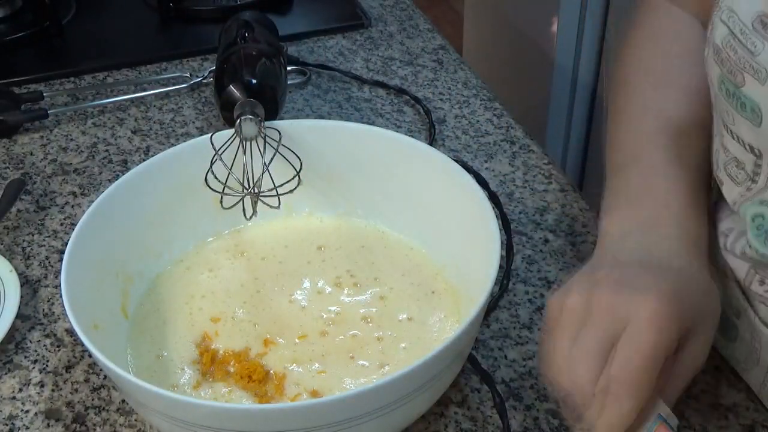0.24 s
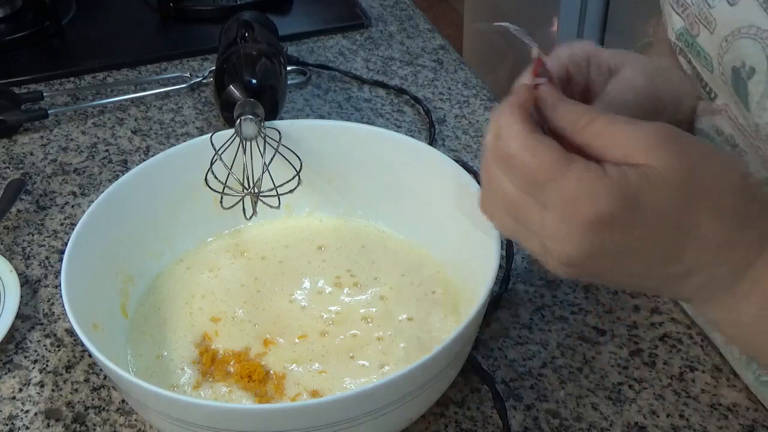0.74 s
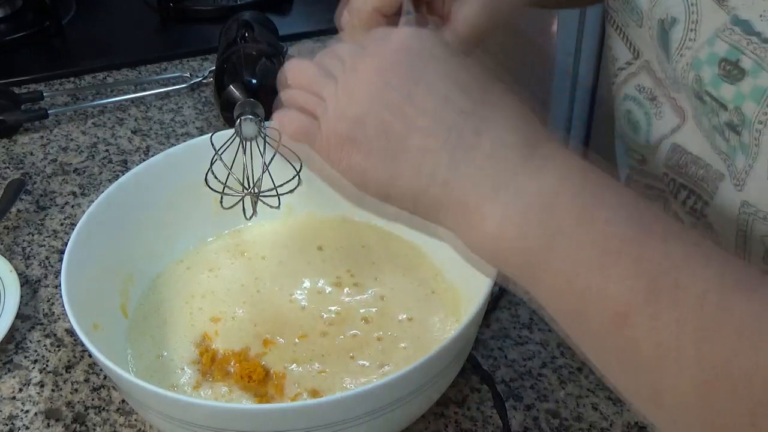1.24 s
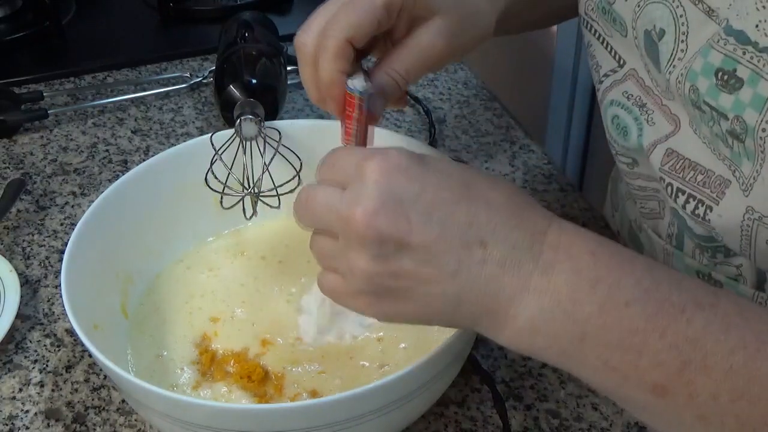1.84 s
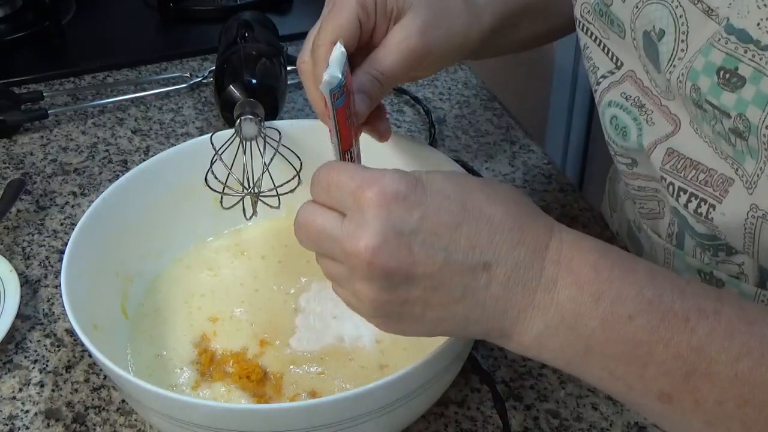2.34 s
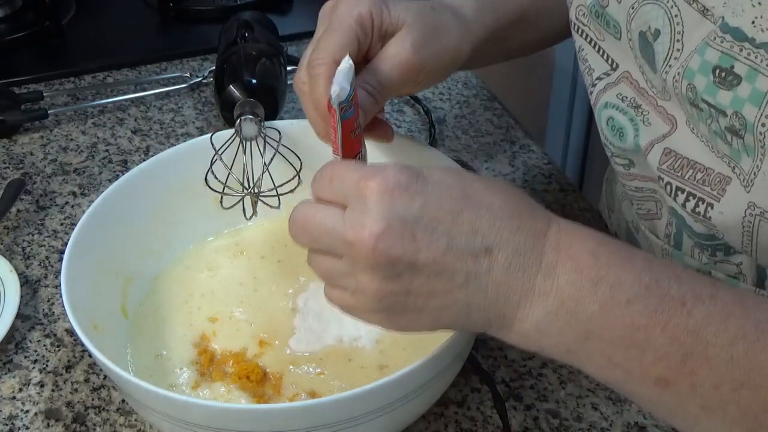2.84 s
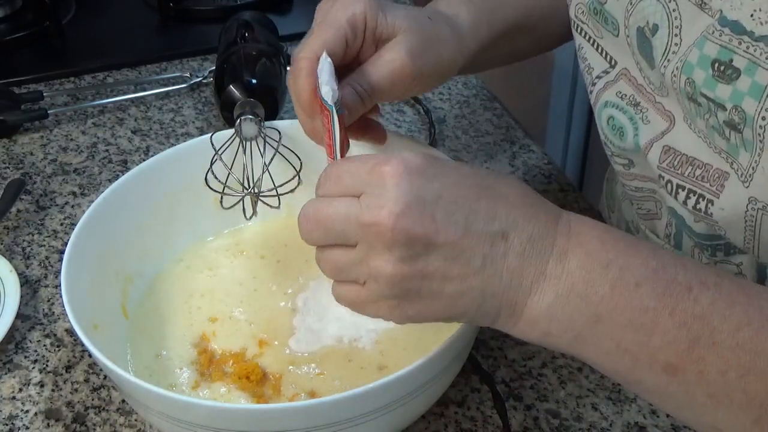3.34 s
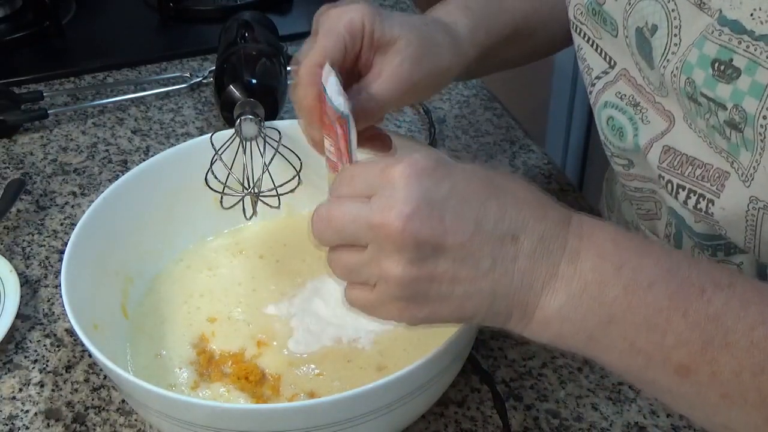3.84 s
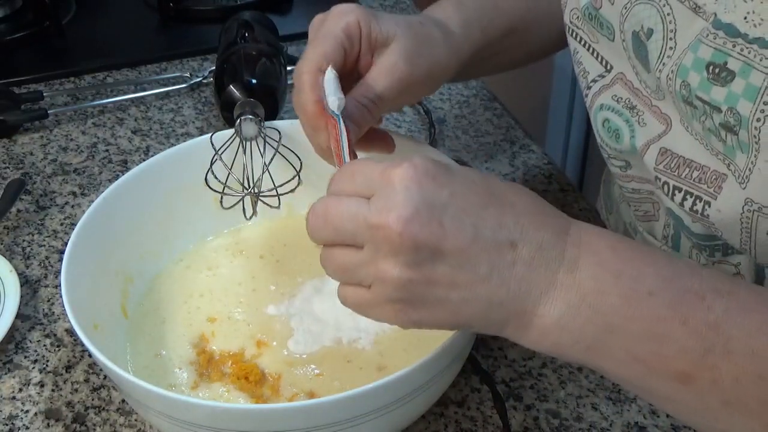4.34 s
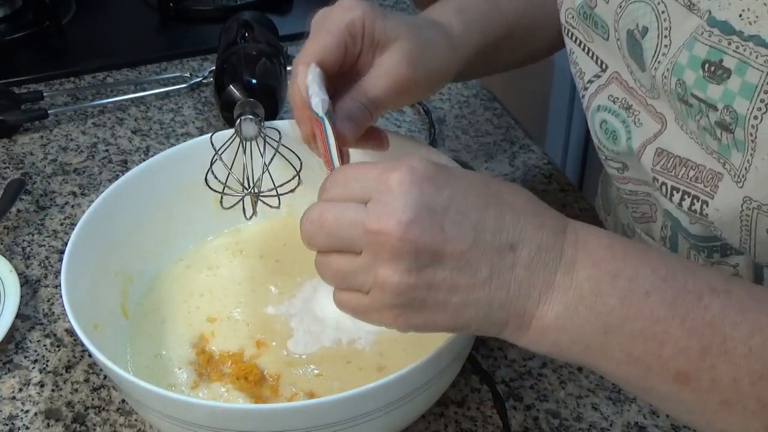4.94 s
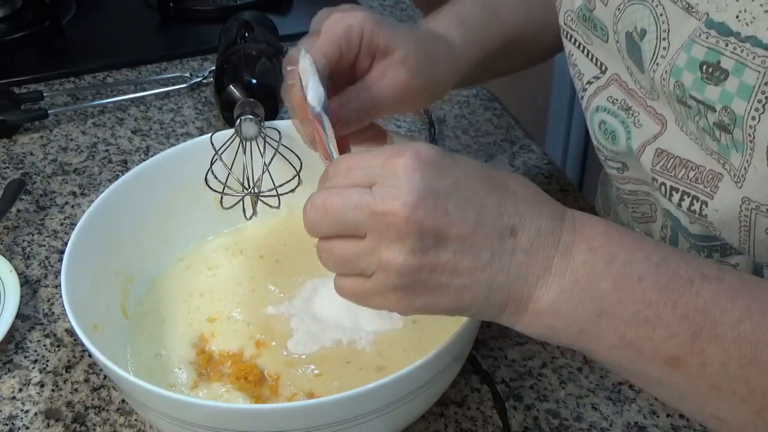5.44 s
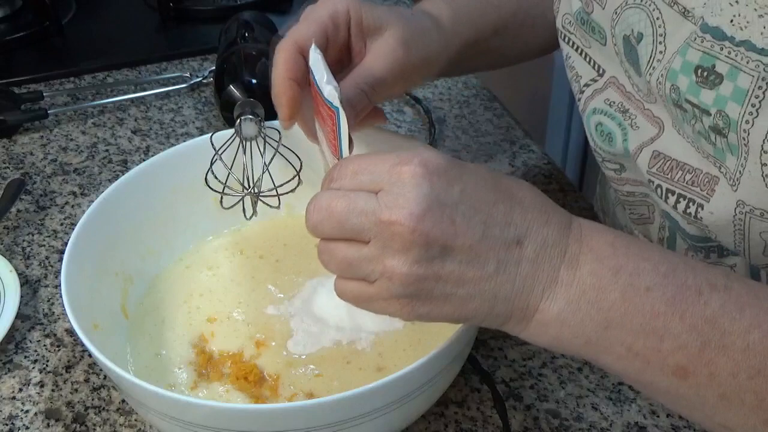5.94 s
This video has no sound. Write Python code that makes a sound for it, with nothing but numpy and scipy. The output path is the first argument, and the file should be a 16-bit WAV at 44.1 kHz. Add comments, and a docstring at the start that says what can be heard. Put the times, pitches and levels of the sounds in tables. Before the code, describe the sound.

A quiet kitchen with a soft, low, slightly wavering hum, heard close up with quick bowl and counter reflections and a short tail. At 0 s a rustle is already dying away, gone within half a second. Until about 1.3 s fingers open a paper sachet: rubbed paper, short sliding strokes, scattered dry ticks, stronger snaps near 0.27, 0.67 and 1.0 s, the last with a faint thump. Powder hisses thinly. Crisp snaps cluster at 1.5-1.75 s, then a sparse lull until ticks at 2.6-2.8 s. Sharper clusters follow around 3.2-3.3 and 3.6 s, then 3.9-4.1 s, ending in a hard snap. From 4.5 to 4.9 s a shake makes rapid loud crackles. After a quieter pause around 5.1 s, a second shake runs from 5.3 s, with soft dull thumps near 5.5, 5.8 and 6.1 s, the latter two joined by bright, strong crunchy snaps.

```python
"""A rustle fades in a small humming kitchen as fingers open a paper sachet over a mixing bowl.
The sachet is flexed, then shaken twice near the end; soft thumps come mostly with the last shake.
Throughout, creases buckle in short dry snaps, dense grains make rubbed paper and hissing powder,
and quick reflections and a short tail answer. The hum is coloured noise and wavering tones."""
import sys
import numpy as np
from scipy import signal
from scipy.fft import rfft, irfft
from scipy.io import wavfile
from scipy.ndimage import uniform_filter1d

SR = 44100
rng = np.random.default_rng(int(sys.argv[2]) if len(sys.argv) > 2 else 0)


def waveform_to_disk(signal):
    """Save audio, clipped to [-1, 1], as 16-bit WAV at the path in sys.argv[1]."""
    frames = np.transpose(np.atleast_2d(signal))
    scaled = np.clip(frames, -1, 1) * 32767
    samples = np.round(scaled).astype(np.int16)
    wavfile.write(sys.argv[1], SR, samples)


N = 273861
TIME_S = np.arange(N) / SR

# kitchen background: [freq_hz, relative_density_db_per_hz]
BACKGROUND_SPECTRUM = [(25, -11), (70, -4), (110, -3), (200, -1.5), (300, -4), (400, -8.5), (600, -5.5),
                       (850, -9), (1200, -11), (2000, -14), (3500, -32), (6000, -17), (9500, -49),
                       (11500, -32)]
BACKGROUND_DB = -59
# drone tones, each swelling once: [freq_hz, level_db, swell_centre_s, swell_half_s, swell_db]
DRONE_TONES = [(134.8, -70, 0.49, .5, 6), (166, -71, 3.1, .25, 4.5), (204, -69, 1.42, 0.56, 7),
               (238, -71, 3.05, 0.18, 8)]
# rustle dying away at the start: [freq_hz, relative_density_db_per_hz]
FADING_SPECTRUM = [(35, -9), (60, -6), (150, -11), (315, -1.5), (383, -15), (619, 0.5), (1110, -1.5),
                   (1300, -1.5), (2720, -3), (4210, -7.5), (8840, -6.5), (11000, -15), (14300, -40),
                   (22000, -120)]
# kitchen reverberation: [freq_hz, t60_s, relative_level_db]
ROOM_BANDS = [(148, 0.62, -7.5), (610, 0.19, 11), (1950, 0.31, 2.5), (4800, 0.44, -0.5), (10000, 0.26, 1.5)]
# hands jerking the sachet: [start_s, level_db, decay_s]
HAND_THUMPS = [(.99, -58.5, 0.02), (4.07, -77, 0.012), (5.497, -54, 0.014), (5.799, -47.5, 0.042),
               (5.906, -61, 0.0098), (6.109, -45.5, 0.021)]
# sliding powder: [freq_hz, relative_density_db_per_hz]
POWDER_SPECTRUM = [(1000, -1.5), (3000, -10.5), (5000, 0), (7500, 6), (9500, 10), (11500, 1.5)]
# powder slides in the tilted sachet, before offset and rests: [centre_s, half_s, level_db]
POWDER_SLIDES = [(0.0, 0.032, -41.5), (0.223, 0.022, -47.5), (0.69, 0.099, -47.5), (1.296, 0.024, -45.5),
                 (1.547, 0.14, -51.5), (2.06, 0.18, -51.5), (3.426, 0.12, -54), (4.21, 0.056, -53.5),
                 (4.76, 0.14, -56)]
TRICKLE_DB = -56.5  # powder between slides, before offset and rests
# rubbed paper: [freq_hz, relative_density_db_per_hz]
RUB_SPECTRUM = [(150, -17), (400, 7), (600, 2.5), (900, 1.5), (1800, -1), (3000, 2), (5000, -4),
                (11000, -19.5)]
# fingers opening the sachet, then two shakes; rub_db before offsets and rests, crinkle_db before
# snap offset and resonances: [start_s, end_s, rub_db, crinkle_db]
HANDLING_BOUTS = [(0.03, 1.303, -49.5, -57.5), (4.5, 4.954, -48.5, -51), (5.327, 6.211, -49, -52.5)]
HOLDING_DB, BOUT_ATTACK_S, BOUT_RELEASE_S = -55.5, 0.035, 0.18  # level between bouts, as rub_db
# hands at rest, hushing rub and powder: [centre_s, half_s, dip_db]
HAND_RESTS = [(0.36, 0.03, -4.5), (1.38, 0.018, -4.5), (2.485, .1, -4), (4.395, 0.055, -3),
              (5.11, 0.13, -6), (5.726, 0.029, -11), (6.06, 0.059, -16)]
# fingers sliding along the paper: [centre_s, half_s, level_db, pitch_hz]
FINGER_STROKES = [(.606, 0.052, -54, 1840), (0.833, .02, -47, 2750), (0.968, 0.019, -47.5, 3340),
                  (1.21, 0.077, -55, 5030), (4.43, 0.026, -57.5, 1850), (5.248, 0.032, -55.5, 1720)]
# resonances and hollows of the sachet above the bowl: [freq_hz, width_hz, gain_db]
SACHET_RESONANCES = [(309, 13, 11.5), (586, 144, 6.5), (930, 196, -9), (1150, 440, 10), (1402, 150, -9),
                     (1810, 390, 5.5), (2580, 450, 4), (9420, 4300, 6.5)]
# buckling creases, level before offset and resonances; a sharper fold is brighter, a smaller facet
# rings higher: [start_s, crumple_s, level_db, brightness_db_per_octave, facet_pitch_hz]
CREASE_SNAPS = [(.2654, 0.00035, -35.5, -2, 5200), (.3888, .0006, -47.5, 3, 9550),
                (.494, 0.0043, -48.5, 3.5, 8400), (.5789, .001, -49.5, 7.5, 4900),
                (.6685, 0.0064, -32.5, 2.5, 940), (.7144, .0034, -44.5, 1.5, 900),
                (.9584, .0007, -50, 0, 9050), (.9972, 0.0011, -34.5, 6, 3340),
                (1.2175, 0.00092, -49, 0.5, 4600), (1.5253, 0.00058, -37.5, 2.5, 900),
                (1.5315, .0011, -39, 2.5, 1200), (1.5499, 0.0013, -44, -4, 2780),
                (1.7125, 0.0014, -35, 0, 6000), (1.7396, 0.00055, -42, .5, 2300),
                (2.563, 0.00024, -37, 2, 1350), (2.596, 0.005, -45.5, -3, 1310),
                (2.6299, 0.00033, -39.5, 0.5, 9150), (2.7739, 0.0023, -40.5, -2, 2640),
                (3.1938, 0.0011, -39, 3.5, 7200), (3.233, 0.00075, -33, 3.5, 2250),
                (3.2674, 0.00036, -37, 4, 2320), (3.2757, 0.00059, -30.5, 3, 4330),
                (3.517, 0.0026, -54, -3, 1200), (3.5925, .0018, -52.5, -4.5, 2210),
                (3.6026, 0.0016, -37.5, -1.5, 5900), (3.7342, .0007, -46.5, 1.5, 7260),
                (3.892, 0.0018, -44.5, -2.5, 3580), (3.9112, 0.0013, -40, 1, 2370),
                (3.9779, .0005, -45, -2.5, 3000), (4.0523, .0005, -39.5, -1.5, 6600),
                (4.0804, 0.0006, -28.5, 4, 890), (4.4824, .0005, -47.5, -1, 2190),
                (4.4931, 0.002, -44, 0.5, 8800), (4.5392, 0.0011, -40, -2, 4830),
                (4.558, 0.00093, -31.5, -1, 2000), (4.637, .003, -46, -.5, 2200),
                (4.647, 0.0014, -31, 0, 2250), (4.6582, 0.0018, -28, 1.5, 1540),
                (4.738, 0.0008, -40.5, -3, 2600), (4.7752, 0.0015, -46, -1, 2400),
                (4.7973, 0.0023, -51.5, -9, 2200), (4.81, 0.00094, -32.5, 5.5, 905),
                (4.8956, 0.0025, -53.5, -10, 1900), (4.9066, .0004, -40.5, 4, 7760),
                (5.1615, .003, -56, 4, 2400), (5.1898, 0.0012, -53, -5.5, 2000),
                (5.201, 0.00082, -47, -2.5, 5750), (5.2928, 0.0041, -49, -5, 2400),
                (5.3313, 0.0021, -37, 0, 1440), (5.3937, 0.0068, -45.5, -5.5, 840),
                (5.412, 0.00082, -39, -1.5, 5870), (5.4382, 0.0017, -40, 1.5, 5230),
                (5.466, 0.0023, -55.5, -8, 2200), (5.497, 0.0017, -42, -6, 7200),
                (5.5401, .0026, -43, -3, 6000), (5.5649, 0.00067, -37, -1.5, 1860),
                (5.656, 0.0019, -45.5, -5.5, 3800), (5.7262, 0.0014, -52, -2.5, 1150),
                (5.781, .0029, -40, 5, 886), (5.798, .0023, -36.5, -1.5, 6100),
                (5.8061, 0.0019, -27, 0.5, 8100), (5.812, 0.0047, -32.5, -3.5, 7800),
                (5.8468, 0.0014, -39.5, 2.5, 6470), (5.9066, 0.0028, -41.5, -6, 7500),
                (5.9848, 0.0011, -39.5, 4, 1010), (6.1053, 0.0063, -43.5, -1, 8400),
                (6.1229, 0.0079, -38, 8, 2380), (6.126, 0.0038, -26.5, 1, 7950)]
# snap at brightness 0, hollow body to crisp edge: [freq_hz, density_db_per_hz]
SNAP_SPECTRUM = [(530, -42.5), (1070, -42.5), (1600, -36.5), (2800, -35.5), (3860, -34.5), (5840, -35.5),
                 (7400, -40), (10100, -42.5)]
BRIGHTNESS_PIVOT_HZ = 4070
FACET_DB, FACET_OCTAVES = 7.5, 0.3  # resonance height and half-width
# the hollow body grows over EMPTYING_S, full from EMPTY_S
EMPTY_S, EMPTYING_S, HOLLOW_DB, HOLLOW_HZ = 6.05, 0.53, 6.5, 1150
# faint random creases; mean brightness, median facet pitch
CRINKLE_S, CRINKLE_BRIGHTNESS_DB_PER_OCTAVE, CRINKLE_HZ = 0.002, -1.5, 2320
CUTOFF_HZ = 11090


def from_db(db):
    """Decibels to gain."""
    return 10 ** (np.asarray(db) / 20)


def rms_one(x):
    """Scale to rms 1."""
    return x / np.sqrt(np.mean(x ** 2) + 1e-20)


def at_hz(points, hz, axis=1):
    """Read a table column on a log-frequency axis."""
    points = np.array(points)
    return np.interp(np.log(hz + 1e-3), np.log(points[:, 0]), points[:, axis])


def bell(x, centre, half_width):
    """Smooth hump of height 1."""
    return np.exp(-((x - centre) / half_width) ** 2 / 2)


def band(x, low_hz, high_hz, order=2):
    """Causal band-pass."""
    edges_hz = [low_hz, min(high_hz, SR / 2.2)]
    return signal.sosfilt(signal.butter(order, edges_hz, "band", fs=SR, output="sos"), x)


def coloured(x, spectrum):
    """Give a steady sound a spectrum; rms 1."""
    hz = np.arange(N // 2 + 1) * SR / N
    return rms_one(irfft(rfft(x) * from_db(at_hz(spectrum, hz)), N))


def stereo(mid, side, side_db):
    """Mid plus and minus a scaled side signal."""
    return mid + from_db(side_db) * np.array([side, -side])


def diffuse(side_db):
    """White noise with unrelated mid and side."""
    return stereo(*rng.standard_normal((2, N)), side_db)


def wander(knots_per_s, count):
    """Unrelated slow random curves."""
    knots = rng.standard_normal((count, 200))
    return np.array([np.interp(TIME_S * knots_per_s, np.arange(len(row)), row) for row in knots])


def grains(per_s, spread_db, size=N):
    """Random tiny clicks of uneven size and random sign."""
    sizes = from_db(spread_db * np.minimum(rng.exponential(1, size), 4))
    signs = rng.choice([-1, 1], size)
    return sizes * signs * (rng.random(size) < per_s / SR)


def add(out, start_s, sound):
    """Mix a short sound in."""
    start = max(round(start_s * SR), 0)
    out[start:start + len(sound)] += sound[:N - start]


def background(waver=0.74):
    """Soft room noise and a drone whose tones waver in pitch and strength."""
    out = from_db(BACKGROUND_DB) * coloured(diffuse(side_db=-12), BACKGROUND_SPECTRUM)
    for hz, db, centre_s, half_s, swell_db in DRONE_TONES:
        real, imaginary = wander(knots_per_s=11, count=2)
        modulation = 1 + waver * (real + 1j * imaginary)
        tone = rms_one(np.real(modulation * np.exp(2j * np.pi * hz * TIME_S)))
        out = out + tone * from_db(db + swell_db * bell(TIME_S, centre_s, half_s))
    return out


def fading_rustle(start_db=-36, t60_s=0.49):
    """The room still rings from an earlier movement: coloured noise decays exponentially."""
    decay = np.exp(-np.log(1000) * TIME_S / t60_s)
    return coloured(diffuse(side_db=-7.0), FADING_SPECTRUM) * from_db(start_db) * decay


def kitchen(x, near_db=-9, near_decay_s=0.0049, tail_db=-6, gap_s=0.0064,
            near_side_db=-3, tail_side_db=-7):
    """Bowl and counter reflect quickly; walls add a short tail that dies by band."""
    t = TIME_S[:SR // 2]
    edges_hz = np.geomspace(80, 12800, 12)
    white, tail = rng.standard_normal((2, 2, len(t))), 0
    for k, (low_hz, high_hz) in enumerate(zip(edges_hz, edges_hz[1:])):
        hz = np.sqrt(low_hz * high_hz)
        decay = np.exp(-np.log(1000) * t / at_hz(ROOM_BANDS, hz))
        gain = from_db(at_hz(ROOM_BANDS, hz, axis=2))
        tail = tail + band(white[k % 2], low_hz, high_hz) * gain * decay
    tail = tail * (1 - np.exp(-(t / gap_s) ** 2))
    near = rng.standard_normal((2, len(t))) * np.exp(-t / near_decay_s) * (t > 0.001)
    near = from_db(near_db) * stereo(*rms_one(near), near_side_db)
    tail = from_db(tail_db) * stereo(*rms_one(tail), tail_side_db) / np.sqrt(2)
    return signal.oaconvolve(x[None], (near + tail) / np.sqrt(len(t)), axes=1)[:, :N]


def thumps(low_hz=122, split_hz=190, high_hz=396, knock_db=-5):
    """A jerk of the hands pushes the air in a short dull puff."""
    out, t = np.zeros(N), TIME_S[:SR // 6]
    for start_s, db, decay_s in HAND_THUMPS:
        push = rng.standard_normal(len(t)) * np.exp(-t / decay_s)
        puff = band(push, low_hz, split_hz) + from_db(knock_db) * band(push, split_hz, high_hz)
        add(out, start_s, from_db(db) * puff / np.std(puff[:SR // 40]))
    return out


def powder_gain():
    """Steady trickle with a smooth swell per slide, summed in power."""
    swells = sum((from_db(db) * bell(TIME_S, s, half_s)) ** 2 for s, half_s, db in POWDER_SLIDES)
    return np.sqrt(from_db(TRICKLE_DB) ** 2 + swells)


def bout_gain():
    """Finger effort: a light hold, rising for each bout."""
    gain = np.full(N, from_db(HOLDING_DB))
    for start_s, end_s, db, _ in HANDLING_BOUTS:
        rise = (TIME_S - start_s) / BOUT_ATTACK_S
        fall = (end_s - TIME_S) / BOUT_RELEASE_S
        gate = np.clip(np.minimum(rise, fall) + 1, 0, 1)
        gain = np.maximum(gain, from_db(db) * gate)
    return gain


def rest_gain():
    """Smooth dip for each rest of the hands."""
    return from_db(sum(dip_db * bell(TIME_S, s, half_s) for s, half_s, dip_db in HAND_RESTS))


def handling(powder_offset_db=-0.5, rub_offset_db=-7.0, crackle_offset_db=-8.0):
    """Powder streams in countless grains; fingers rub the paper and set off lone tiny crackles."""
    powder = coloured(grains(per_s=14000, spread_db=1.5), POWDER_SPECTRUM)
    rub = coloured(grains(per_s=2200, spread_db=2.0), RUB_SPECTRUM)
    clicks = grains(per_s=110, spread_db=3.0)
    crackle = rms_one(resonate(band(clicks, 1200, 6000, order=1)))
    fingers = rub * from_db(rub_offset_db) + crackle * from_db(crackle_offset_db)
    return powder * from_db(powder_offset_db) * powder_gain() + fingers * bout_gain()


def strokes(width_ratio=1.5, broad_db=-12):
    """A sliding finger swells and fades as dense grains around one pitch."""
    out, centre_s = np.zeros(N), 1 / 4
    for s, half_s, db, hz in FINGER_STROKES:
        friction = grains(per_s=4400, spread_db=4.5, size=SR // 2)
        pitched = rms_one(band(friction, hz / width_ratio, hz * width_ratio))
        rasp = pitched + from_db(broad_db) * rms_one(band(friction, 1500, 8700))
        swell = bell(TIME_S[:SR // 2], centre_s, half_s)
        add(out, s - centre_s, from_db(db) * rasp * swell)
    return out


def resonate(x):
    """Chain of peaks and dips, one per sachet resonance."""
    for hz, width_hz, db in SACHET_RESONANCES:
        g, k = from_db(db / 2), np.pi * width_hz / SR
        c = -2 * np.cos(2 * np.pi * hz / SR)
        x = signal.lfilter([1 + k * g, c, 1 - k * g], [1 + k / g, c, 1 - k / g], x)
    return x


def crinkles(count=6):
    """Faint creases give way at random in each bout; rows like those of CREASE_SNAPS."""
    rows = []
    for start_s, end_s, _, db in HANDLING_BOUTS:
        places = (np.arange(count) + rng.random(count)) / count
        for place, (sharpness, octaves) in zip(places, rng.standard_normal((count, 2))):
            s = start_s + place * (end_s - start_s)
            brightness = CRINKLE_BRIGHTNESS_DB_PER_OCTAVE + 2 * sharpness
            rows.append((s, CRINKLE_S, db, brightness, CRINKLE_HZ * 2 ** (octaves / 2)))
    return [row for row in rows if row[0] < TIME_S[-1]]


def snap_colour(hz, s, brightness, facet_hz):
    """Snap spectrum, dB per Hz: paper colour, fold tilt, facet ring, emptying sachet's hollow."""
    octaves = np.log2(np.clip(hz, 700, 9000) / BRIGHTNESS_PIVOT_HZ)
    facet = FACET_DB * bell(np.log2((hz + 1) / facet_hz), 0, FACET_OCTAVES)
    empty = np.clip(1 + (s - EMPTY_S) / EMPTYING_S, 0, 1)
    hollow = empty * HOLLOW_DB / (1 + (hz / HOLLOW_HZ) ** 4)
    return at_hz(SNAP_SPECTRUM, hz) + brightness * octaves + facet + hollow


def snaps(rows, kick=2.06, swell_ratio=1.0, flutter_db=-15, flutter_s=0.0057, slip_spread_db=4.5,
          offset_db=-2.0, blur_hz=800, low_cut_hz=350):
    """A crease gives way at once, smaller slips follow, and the stiff wall flutters for a few ms."""
    t = TIME_S[:SR // 25]
    shape, crumple_s = (len(rows), len(t)), rows[:, 1:2]
    slips = rng.standard_normal(shape) * from_db(slip_spread_db * rng.standard_normal(shape))
    run = np.exp(-t / crumple_s) * (1 - np.exp(-t / (swell_ratio * crumple_s)))
    force = rms_one(slips) * (run + from_db(flutter_db) * np.exp(-t / flutter_s))
    force[:, 0] += kick
    lead, size, level_span = SR // 200, 2048, SR // 154  # samples
    hz = np.arange(size // 2 + 1) * SR / size
    spectra = rfft(np.pad(force, ((0, 0), (lead, 0))), size)
    # even out the spectrum before colouring
    blur_bins = max(int(blur_hz * size / SR), 3)
    spectra = spectra / np.sqrt(uniform_filter1d(np.abs(spectra) ** 2, blur_bins, axis=1))
    out = np.zeros(N)
    for (s, _, db, brightness, facet_hz), spectrum in zip(rows, spectra):
        gain = from_db(db + snap_colour(hz, s, brightness, facet_hz) + offset_db)
        add(out, s - lead / SR, irfft(spectrum * gain * np.sqrt(level_span * SR / 2), size))
    # so small a sheet radiates little bass
    return resonate(signal.sosfilt(signal.butter(2, low_cut_hz, "high", fs=SR, output="sos"), out))


def scene(left_db=0.5, count=4):
    """Sachet just left of centre; crumpled paper sends each wall a snap of a different shape."""
    creases = np.vstack([CREASE_SNAPS, crinkles()])
    soft = thumps() + strokes() + handling() * rest_gain()
    reflections = sum(kitchen(snaps(creases) + soft) for wall in range(count)) / np.sqrt(count)
    direct = snaps(creases, blur_hz=2200) + soft
    sachet = (direct + reflections) * from_db([[left_db], [-left_db]])
    return sachet + fading_rustle() + background()


def record(dry):
    """Steep low-pass."""
    return signal.sosfilt(signal.ellip(12, 0.2, 75, CUTOFF_HZ, fs=SR, output="sos"), dry)


dry = scene()
out = record(dry)
waveform_to_disk(out)
```